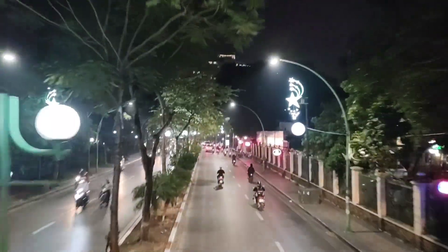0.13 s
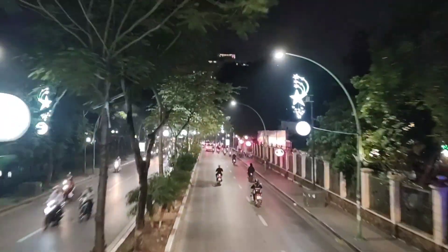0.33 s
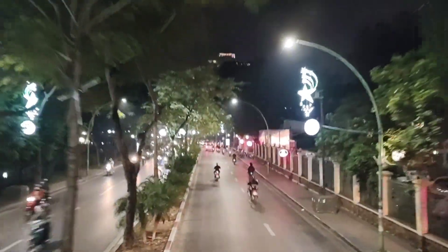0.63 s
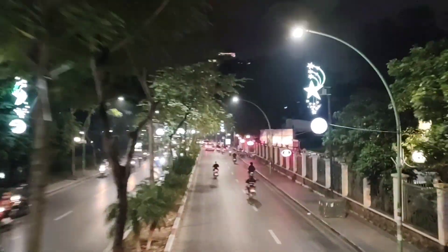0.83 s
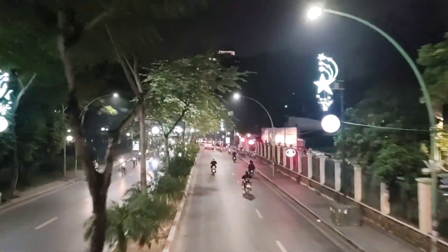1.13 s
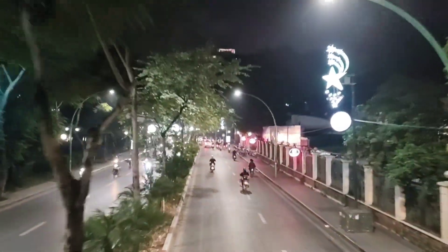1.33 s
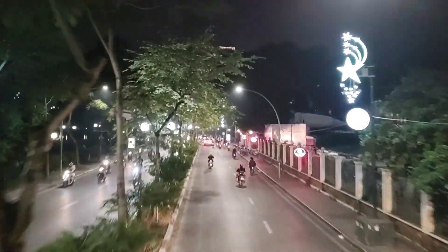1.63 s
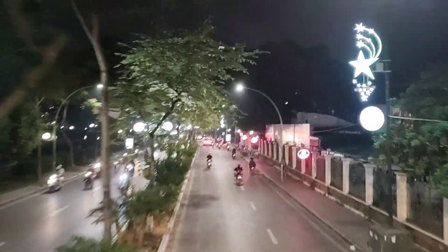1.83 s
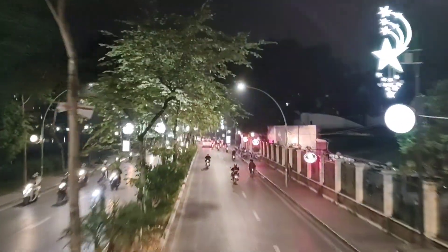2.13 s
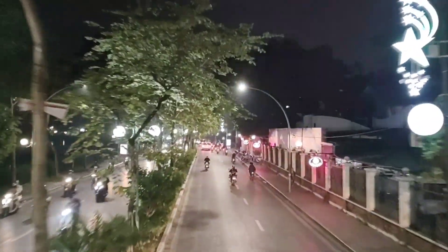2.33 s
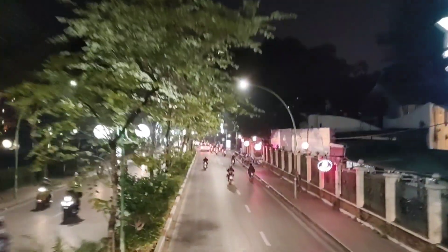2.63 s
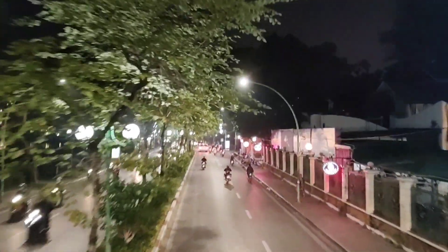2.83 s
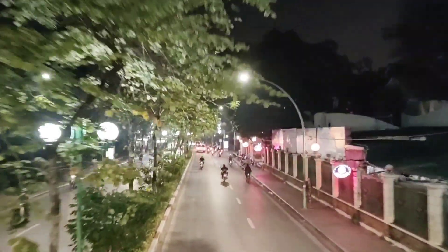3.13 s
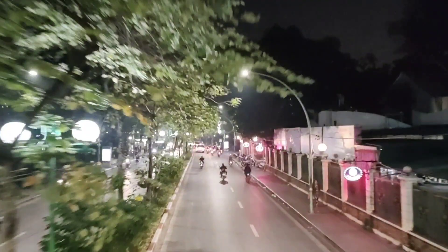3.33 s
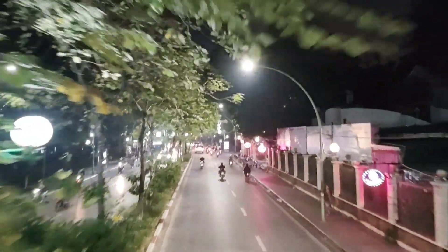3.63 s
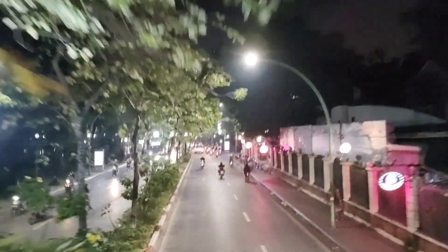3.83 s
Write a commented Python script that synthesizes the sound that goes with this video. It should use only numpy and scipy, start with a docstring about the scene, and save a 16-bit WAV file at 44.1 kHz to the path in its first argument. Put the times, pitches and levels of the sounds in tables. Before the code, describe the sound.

Wind buffets a microphone in heavy low thumps over steady motorbike traffic and road noise.

```python
"""Riding in the open along a city street, above motorbike traffic, with wind on the microphone.
Engine drone (wavering tones) and road noise and hiss (shaped noise) run throughout; wind dies away at the start.
From half a second on, gusts rush past (a noise field read at changing speed), with hard buffets (short jolts).
Around three seconds leaves swish past, loudest just after (bright noise that swells and fades).
Throughout, the recorder's limiter ducks the bass and middle whenever they get strong."""
import sys
import numpy as np
from scipy import signal
from scipy.fft import rfft, irfft
from scipy.io import wavfile
from scipy.ndimage import uniform_filter1d, map_coordinates

SR = 44100
rng = np.random.default_rng(int(sys.argv[2]) if len(sys.argv) > 2 else 0)


def store_pcm(level_fs):
    """Save levels as 16-bit WAV."""
    pcm = np.round(np.clip(level_fs, -1, 1) * 32767).astype(np.int16)
    wavfile.write(sys.argv[1], SR, np.atleast_2d(pcm).T)


N = 176400
T = np.arange(N) / SR


def amp(db):
    """Turns decibels into a gain."""
    return 10 ** (np.asarray(db) / 20)


def unit(x):
    """Scales a signal to rms 1."""
    return x / np.sqrt(np.mean(x ** 2) + 1e-20)


def curve(points):
    """Joins (time, value) points with straight lines over the whole scene."""
    return np.interp(T, *np.transpose(points))


def spectrum_gain(spectrum, size):
    """Gain at each frequency of a transform, drawn through the points on a log pitch scale."""
    hz, db = np.transpose(spectrum)
    f = np.fft.rfftfreq(size, 1 / SR)
    return amp(np.interp(np.log(f + 1), np.log(hz), db))


def noise(spectrum, size=N):
    """Random noise of rms 1 with the given spectrum."""
    white = rng.standard_normal(size)
    return unit(irfft(rfft(white) * spectrum_gain(spectrum, size), size))


def wander(rate_hz):
    """A random drift of rms 1, mostly slower than the given rate."""
    f = np.fft.rfftfreq(N, 1 / SR)
    white = rng.standard_normal(N)
    return unit(irfft(rfft(white) / (1 + (f / rate_hz) ** 4), N))


def add(mix, s, sound):
    """Mixes a sound in from time s, in seconds."""
    part = mix[max(round(s * SR), 0):][:len(sound)]
    part += sound[:len(part)]


# Spectrum of tyres and motorbikes on the road: (f/Hz, relative level/dB per Hz)
ROAD = [(20, -10), (60, 11), (300, 3.5), (560, 5), (800, 0.5), (1200, -1), (1600, 0.5), (2350, -3.5),
        (2850, -9.5), (3300, -18), (4500, -34.5)]
# Loudness of the road, before its flicker: (t/s, level/dB)
ROAD_LEVEL = [(0, -35.5), (.22, -35.5), (.8, -35.5), (1.25, -35), (1.38, -38), (1.5, -37), (1.72, -37),
              (1.83, -39.5), (2.15, -37.5), (2.4, -39.5), (2.56, -37.5), (2.66, -39.5), (3.05, -35.5),
              (3.3, -35), (3.38, -41), (3.44, -35), (3.5, -38), (3.65, -34.5), (3.8, -38.5), (4, -33.5)]
ROAD_FLICKER_DB = .7


def road():
    """Many small tyre and motor sounds blend into noise whose level flickers."""
    level_db = curve(ROAD_LEVEL) + ROAD_FLICKER_DB * wander(rate_hz=60)
    return noise(ROAD) * amp(level_db)


# Spectrum of the far street hiss: (f/Hz, relative level/dB per Hz)
HISS = [(300, -5), (2500, -0.5), (3600, -1), (4500, 1), (5300, -5.5), (6300, -4), (7400, -11), (8000, -11)]
# Loudness of the hiss, before its flicker: (t/s, level/dB)
HISS_LEVEL = [(0, -54.5), (.4, -54.5), (.6, -53), (1, -54), (1.9, -57), (2.45, -57), (2.85, -54),
              (3.4, -55.5), (4, -55)]


def hiss(flicker_db=0.5):
    """The far street blends into a faint noise that flickers gently."""
    level_db = curve(HISS_LEVEL) + flicker_db * wander(rate_hz=30)
    return noise(HISS) * amp(level_db)


# Engine tones, whose pitch wavers around f: (f/Hz, level/dB)
DRONE = [(118, -44.5), (155, -38), (248, -50), (335, -45), (450, -58)]
DRONE_WAVER_HZ = 10.15  # rms


def drone():
    """Engines hum as a few tones, each wavering in pitch and strength on its own."""
    out = np.zeros(N)
    for hz, db in DRONE:
        pitch_hz = hz + DRONE_WAVER_HZ * wander(rate_hz=24.3)
        tone = np.sin(2 * np.pi * np.cumsum(pitch_hz) / SR)
        swell = 1 + 0.26 * wander(rate_hz=17)
        out += amp(db) * unit(tone * swell)
    return out


def traffic():
    """Road noise and far hiss add up with the drone of engines."""
    return road() + hiss() + drone()


SLACK_LEAD_S, SLACK_WIDTH_S = 0.010983, .005


def slack():
    """From 0 to 1: the flow slackens in a short bell-shaped lull just before each buffet."""
    coarse_t = T[::32]  # a coarse time grid saves work
    lulls = np.array([s - SLACK_LEAD_S for s, *_ in BUFFETS])
    bells = np.exp(-.5 * ((coarse_t[:, None] - lulls) / SLACK_WIDTH_S) ** 2)
    return np.interp(T, coarse_t, bells.max(axis=1))


EVENNESS = 0.78  # 0 leaves the swells alone, 1 levels them fully
EDDY_SPAN_S = 0.012  # half the length of the levelling window


def evened(x):
    """Partly levels the chance swells of a noise, so that each gust is solid."""
    window = np.hanning(int(2 * EDDY_SPAN_S * SR))
    power = abs(signal.fftconvolve(x ** 2, window / window.sum(), "same")) + 1e-9
    return unit(x / power ** (EVENNESS / 2))


# Weaker wind between the gusts, before WIND_DB and flutter: (t/s, level/dB)
BREEZE = [(0, -22), (.04, -41), (.3, -40.5), (.52, -33.5), (.6, -24.5), (.8, -23), (1.25, -14),
          (1.6, -28.5), (1.9, -20), (2.4, -20), (2.48, -22.5), (2.7, -17), (3.18, -18.5), (3.45, -25.5),
          (3.8, -12.5), (4, -22)]
# Separate gusts, before WIND_DB, EDDY_SPEED and flutter: (start t/s, end t/s, level/dB, relative speed)
GUSTS = [(0.482, 0.504, -14.5, 0.85), (0.544, 0.581, -16, 1.05), (0.591, 0.622, -16.5, 0.99),
         (0.635, 0.702, -12.5, 0.95), (0.732, 0.775, -16.5, 1.01), (0.843, 0.875, -11.5, 0.88),
         (0.898, 0.943, -13.5, 1), (0.962, 1.005, -9.0, 1.04), (1.025, 1.063, -10.5, 0.95),
         (1.077, 1.116, -14, 0.99), (1.129, 1.174, -8, 1.034), (1.187, 1.243, -6, 1.11),
         (1.257, 1.314, -10.5, 1), (1.323, 1.382, -9, 1.05), (1.402, 1.44, -12.5, 1.01),
         (1.477, 1.54, -14, 0.99), (1.664, 1.681, -19, 0.89), (1.712, 1.751, -13.5, 1.085),
         (1.772, 1.788, -12.5, 1.04), (1.804, 1.825, -5.5, 1.07), (1.838, 1.911, -14, 0.93),
         (1.923, 2.033, -11.5, 1.024), (2.044, 2.136, -7.5, 1.053), (2.147, 2.205, -13.5, 0.93),
         (2.227, 2.243, -10, 1.03), (2.267, 2.333, -10.5, 1.02), (2.343, 2.446, -7.5, 1.043),
         (2.503, 2.539, -11.5, 0.92), (2.561, 2.588, -10.5, 0.88), (2.607, 2.7, -7, 1.045),
         (2.712, 2.74, -7.0, 1.08), (2.753, 2.805, -9, 1.08), (2.819, 2.85, -8.5, 0.91),
         (2.871, 2.915, -9.5, 0.95), (2.936, 2.983, -12.5, 1.064), (2.993, 3.031, -12, 1.07),
         (3.042, 3.164, -8.5, 1.004), (3.206, 3.271, -8, 0.98), (3.291, 3.336, -13, 1.06),
         (3.341, 3.408, -14.5, 1.08), (3.444, 3.46, -7.5, 0.98), (3.488, 3.561, -13, 0.99),
         (3.577, 3.624, -8.5, 0.97), (3.666, 3.689, -9, 1.19), (3.715, 3.801, -9, 1.14),
         (3.811, 3.868, -7.5, 1.04), (3.884, 4.003, -11.0, 1.04)]
# Spectrum of the turbulent pressure when read at speed 1: (f/Hz, relative level/dB per Hz)
EDDIES = [(20, -25), (45, -18), (70, -15), (115, -0.5), (200, -0.5), (320, -6), (470, -13.5), (680, -25.5),
          (1000, -45), (1600, -66.5), (4000, -100)]
GUST_ATTACK_S, GUST_RELEASE_S = .011, .011  # ramps centred on the start and end times
WIND_DB, EDDY_SPEED, LULL_SPEED = 0.5, .97, .8  # LULL_SPEED stands in for a gust's speed between gusts
FLUTTER_DB, FLUTTER_HZ, SLACK_DB = 1.5, 60.04, 2
SPEED_PER_DB, SPEED_JITTER = 0.0967, .06  # changes of log speed: per dB of flutter, and at random (rms)


def wind():
    """A frozen field of eddies sweeps over the microphone; faster flow raises its pitch."""
    force, pace = amp(curve(BREEZE)), np.full(N, LULL_SPEED)
    for start, end, db, gust_speed in GUSTS:
        ramps = np.minimum((T - start) / GUST_ATTACK_S, (end - T) / GUST_RELEASE_S)
        shape = np.clip(.5 + ramps, 0, 1)
        force = np.maximum(force, amp(db) * shape ** 2)
        pace = pace + (gust_speed - pace) * shape
    flutter_db = FLUTTER_DB * wander(FLUTTER_HZ) - SLACK_DB * slack()
    log_change = SPEED_PER_DB * flutter_db + SPEED_JITTER * wander(rate_hz=69.3)
    speed = EDDY_SPEED * pace * np.exp(log_change)
    # the summed speed says how far along the field we are
    field = noise(EDDIES, size=2 * N)
    pressure = map_coordinates(field, [np.cumsum(speed)], order=3, mode="wrap")
    return evened(pressure) * force * amp(WIND_DB + flutter_db)


SMEAR_S, SMEAR_HZ = .0019, 441  # largest time shift of a pitch, and the span between zero shifts


def burst(spectrum, size=2048):
    """A pressure jolt, centred in its frame; its pitches drift apart in time by chance."""
    f = np.fft.rfftfreq(size, 1 / SR)
    delay_s = SMEAR_S * np.sin(f / SMEAR_HZ * np.pi + 2 * np.pi * rng.random())
    # a delay is a phase that turns steadily with frequency
    turns = rng.random() - np.cumsum(delay_s) * SR / size
    click = np.eye(1, size, size // 2)[0]
    jolt = irfft(rfft(click) * spectrum_gain(spectrum, size) * np.exp(2j * np.pi * turns), size)
    return unit(jolt) * np.sqrt(.004 * SR / size)  # as much energy as 4 ms at rms 1


# Spectrum of a buffet's main push: (f/Hz, relative level/dB per Hz)
BUFFET_BODY = [(40, -20.5), (150, -7), (300, 2), (520, 2), (750, -11), (1000, -28.5), (1600, -48.5),
               (4000, -100)]
# Spectrum of its sharp edge: (f/Hz, relative level/dB per Hz)
BUFFET_EDGE = [(100, -38.5), (500, -3), (850, 9.5), (1250, -3), (1700, -18), (3000, -42.5), (6000, -84)]
BODY_DB, EDGE_DB = -1.5, 1


def buffet(strength_db, edge_db):
    """One violent eddy: a low push of pressure with a sharper edge."""
    body = amp(strength_db + BODY_DB) * burst(BUFFET_BODY)
    edge = amp(edge_db + EDGE_DB) * burst(BUFFET_EDGE)
    return body + edge


# Hard buffets, before BODY_DB and EDGE_DB: (centre t/s, body level/dB, edge level/dB)
BUFFETS = [(0.559, -20, -35.5), (0.653, -29, -33), (0.684, -13.5, -30), (0.765, -15.5, -21),
           (0.822, -13.5, -46), (0.915, -17.5, -25), (0.988, -15, -32), (1.17, -11, -47),
           (1.202, -5.5, -35.0), (1.216, -4.5, -34), (1.229, -16, -30.5), (1.334, -11, -27.5),
           (1.375, -5.5, -40), (1.734, -14, -40.0), (1.817, -21.5, -41.5), (1.883, -15, -46.5),
           (1.961, -11, -38), (2.046, -13, -45), (2.072, -4.5, -18), (2.111, -25, -41.0),
           (2.307, -10, -20.5), (2.324, -15, -28.5), (2.363, -10, -37), (2.385, -6.5, -39),
           (2.433, -7, -26), (2.632, -10.5, -26.5), (2.683, -11, -39.5), (2.726, -8, -24),
           (2.761, -0.5, -36.5), (2.79, -10, -26), (2.944, -7.5, -34), (2.972, -9.5, -33),
           (3.023, -11.5, -41), (3.118, -19.0, -48), (3.16, -1, -35), (3.246, -6, -48), (3.255, -7.5, -26),
           (3.329, -4.5, -25), (3.378, -7, -35), (3.528, -13, -25.5), (3.686, -1, -20.0), (3.724, -14, -37),
           (3.75, -10, -45), (3.776, -7.5, -24.5), (3.834, -8, -44), (3.917, -8, -26.5), (3.933, -8, -21)]


def buffets():
    """Hard blows of air strike the microphone one by one."""
    out = np.zeros(N)
    for s, strength_db, edge_db in BUFFETS:
        jolt = buffet(strength_db, edge_db)
        add(out, s - len(jolt) / 2 / SR, jolt)
    return out


# Loudness of the leaves as they pass, before their flicker: (t/s, level/dB)
LEAVES_LEVEL = [(2.7, -74), (2.82, -54), (2.92, -57), (3.0, -55), (3.09, -48.5), (3.17, -59.5), (3.3, -74)]
# Spectrum of the leaves: (f/Hz, relative level/dB per Hz)
LEAVES = [(800, -22.5), (2200, -9.5), (3000, 9), (3800, 2), (4300, -22.5), (7000, -29.5)]


def leaves(flicker_db=2):
    """Foliage swishes past close by: many tiny rustles blend into flickering bright noise."""
    level_db = curve(LEAVES_LEVEL) + flicker_db * wander(rate_hz=35)
    return noise(LEAVES) * amp(level_db)


MIC_BASS_HZ = 57.6


def scene():
    """Street, wind and leaves meet at one small microphone that picks up little deep bass."""
    air = traffic() + wind() + buffets() + leaves()
    bass_cut = signal.butter(2, MIC_BASS_HZ, "high", fs=SR, output="sos")
    return signal.sosfilt(bass_cut, air)[None]


LIMIT_DB, LIMIT_SHARE = -17, 0.58  # threshold, and the share of the excess dB taken away
SENSE_S, RECOVER_DB_PER_S = 0.014, 222.5
SPLIT_HZ, CUTOFF_HZ = 3200, 7800


def record(dry):
    """A limiter turns down the band below the treble when it is strong; then the top is cut off."""
    low = signal.fftconvolve(dry[0], signal.firwin(numtaps=101, cutoff=SPLIT_HZ, fs=SR), "same")
    treble = dry[0] - low
    power = abs(uniform_filter1d(low ** 2, max(int(SENSE_S * SR), 2)))
    power_db = 10 * np.log10(power + 1e-12)
    # the sensed level follows rises at once and falls no faster than the recovery rate
    fall = T * RECOVER_DB_PER_S
    held_db = np.maximum.accumulate(power_db + fall) - fall
    over_db = np.maximum(held_db - LIMIT_DB, 0)
    smooth_db = uniform_filter1d(uniform_filter1d(over_db, size=160), size=160)
    out = treble + low * amp(-LIMIT_SHARE * smooth_db)
    top_cut = signal.firwin(301, CUTOFF_HZ, window=("kaiser", 8), fs=SR)
    return signal.fftconvolve(out, top_cut, "same")[None]


dry = scene()
out = record(dry)
store_pcm(out)
```